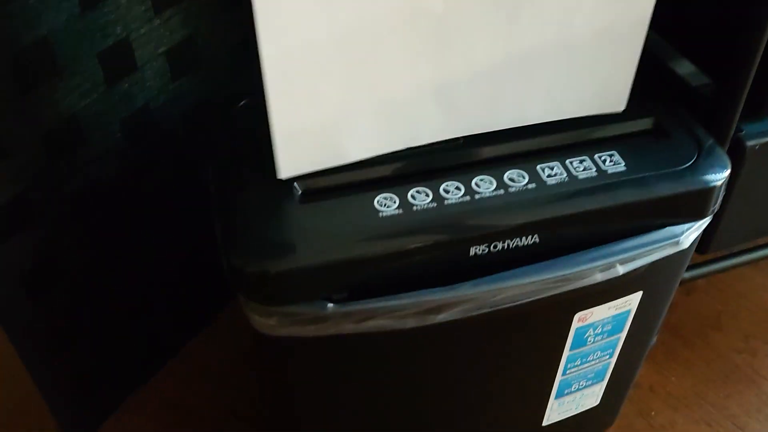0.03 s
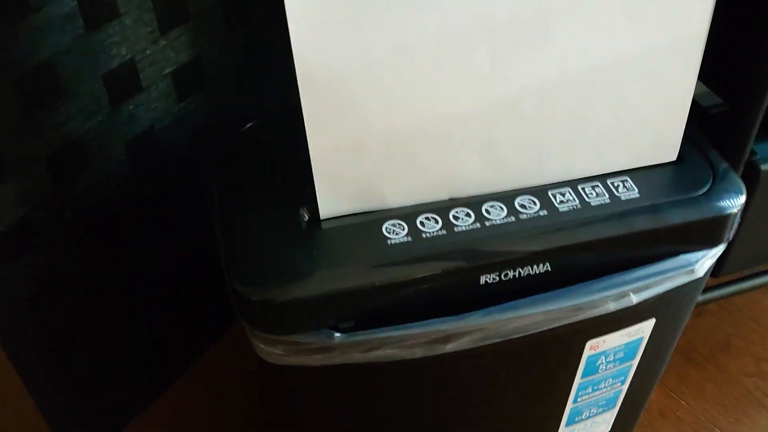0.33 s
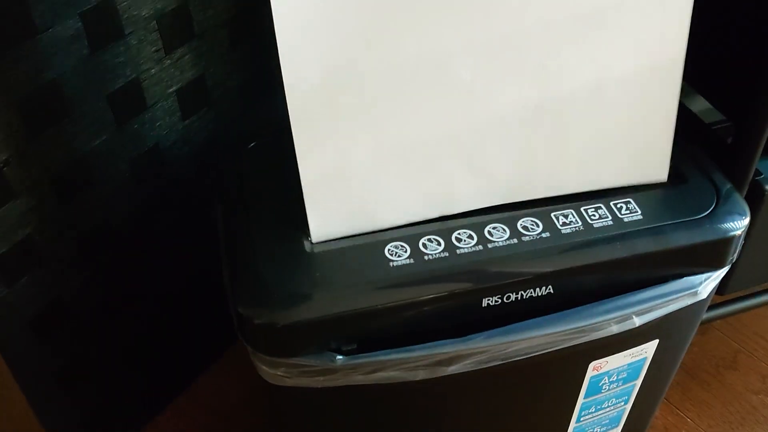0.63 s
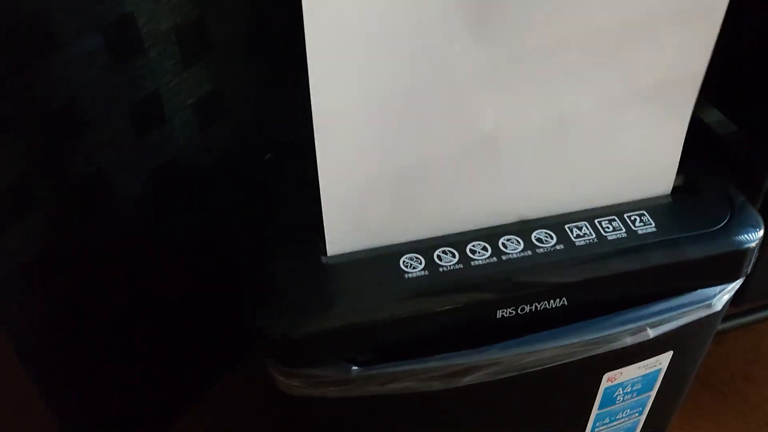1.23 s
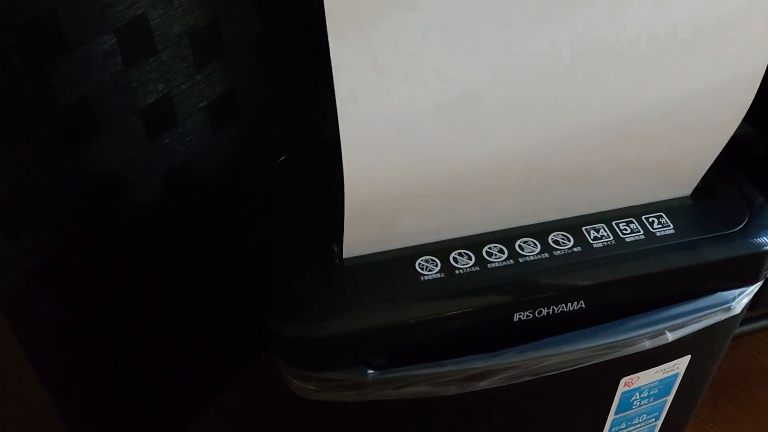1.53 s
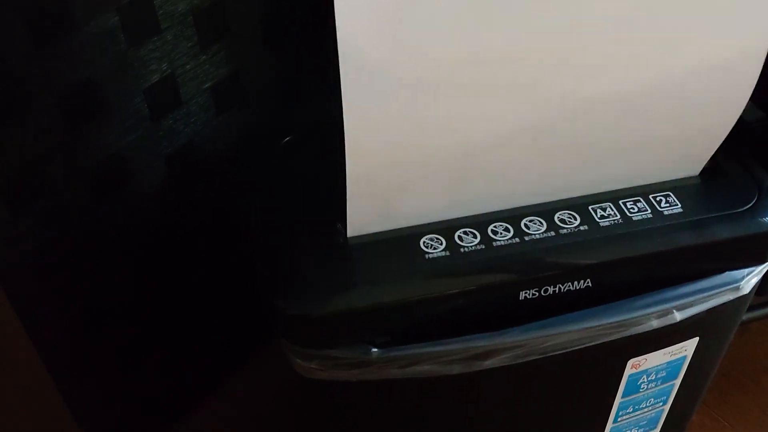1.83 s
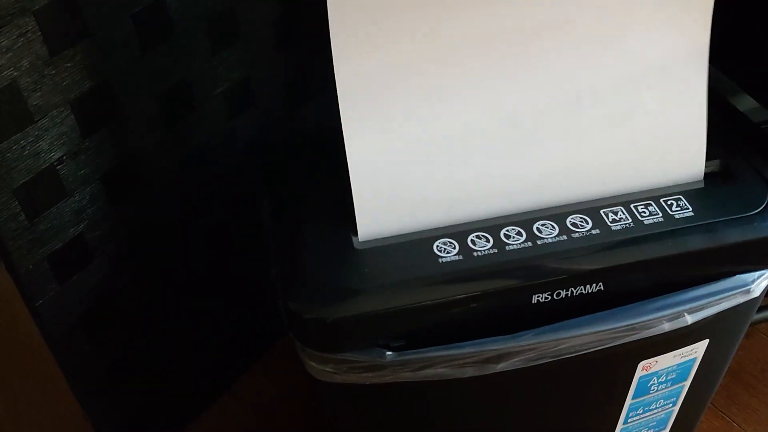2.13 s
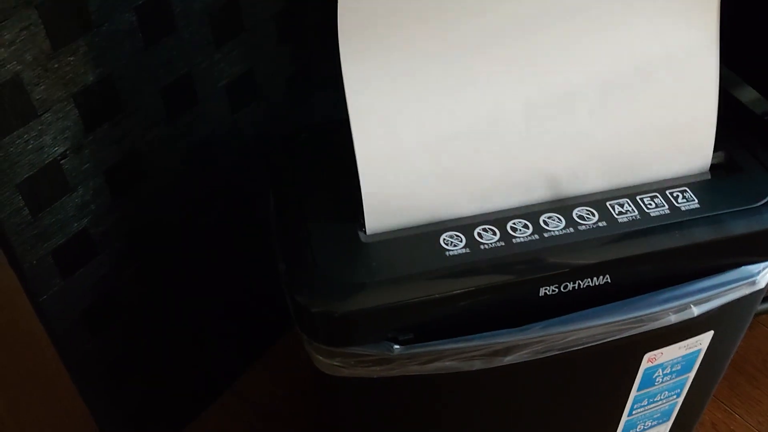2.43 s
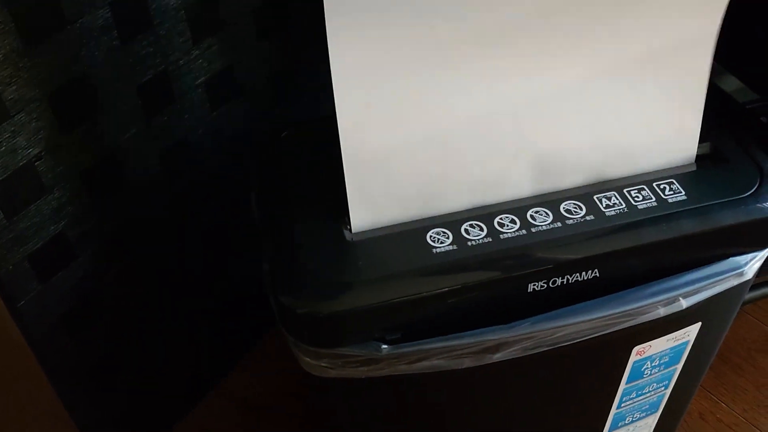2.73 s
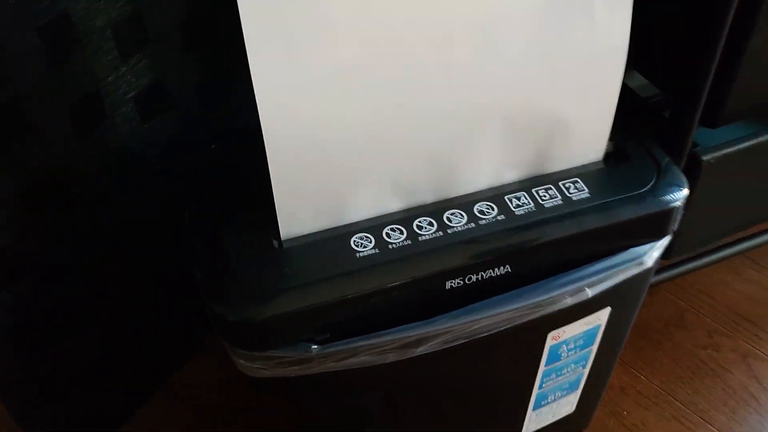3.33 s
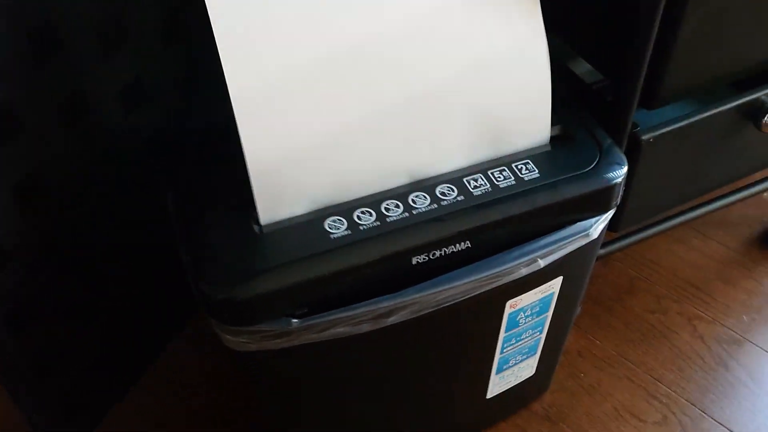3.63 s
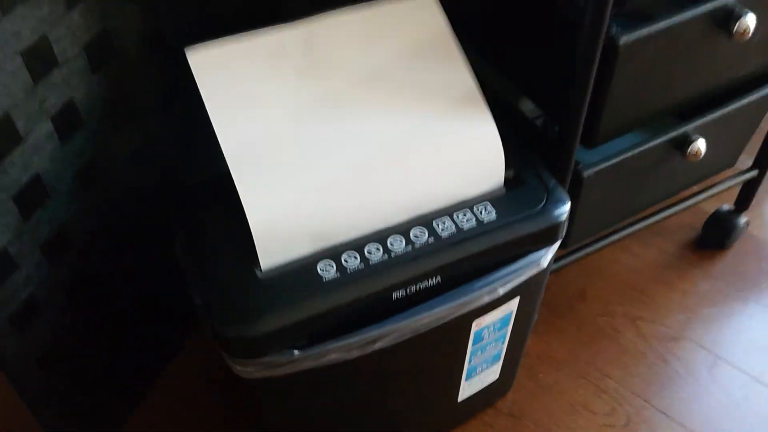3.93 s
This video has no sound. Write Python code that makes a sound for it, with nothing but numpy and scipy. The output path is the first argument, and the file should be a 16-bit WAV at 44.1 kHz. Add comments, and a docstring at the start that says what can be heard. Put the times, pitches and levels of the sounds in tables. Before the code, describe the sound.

A small paper shredder runs in a room. First a sheet rustles and taps at the slot, then the motor spins up with a rattling whine, and the cutters tear the paper with loud crackles and snaps.

```python
"""A small paper shredder in a room. Air rumbles faintly on the microphone throughout.
From 0.2 s a sheet rustles and taps at the slot; at 1.39 s it trips the switch.
The motor spins up with a whine of gears, a rattle and a hiss of brushes.
From 2.5 s the cutters tear the sheet in about 13 crackling bites a second, which drag the motor
down a little. Loud snaps stand out; the bin booms near 3.4 s."""
import sys
import numpy as np
from scipy import signal
from scipy.fft import rfft, irfft, next_fast_len
from scipy.io import wavfile

SR = 44100
rng = np.random.default_rng(int(sys.argv[2]) if len(sys.argv) > 2 else 0)


def put_to_file(sound):
    """Save the sound as 16-bit audio at rate SR, in the file named by the first command-line argument."""
    columns = np.atleast_2d(sound).T  # one column per channel
    safe = np.clip(columns, -1, 1)
    whole_steps = np.round(safe * 32767)
    wavfile.write(sys.argv[1], SR, whole_steps.astype(np.int16))


N = 176400
T = np.arange(N) / SR
FFT_SIZE = next_fast_len(N + SR)
FREQ_HZ = np.maximum(np.arange(FFT_SIZE // 2 + 1) * SR / FFT_SIZE, 1)
START_S, CATCH_S, FIRST_BITE_S = 1.39, 2.535, 2.556
PINION_TEETH, MESHES_PER_IDLER_TOOTH, MESHES_PER_BITE = 4, 5, 62

# Levels are relative; spectra are densities; pan is left minus right.
# left-right likeness of noise: f/Hz, correlation
CORRELATION = [(30, 0), (120, 1), (300, 0.96), (600, 0.68), (1200, 0.25), (8000, 0)]

# air rumble: f/Hz, level/dB
AIR_SPECTRUM = [(25, -6), (40, -7), (60, -23.5), (150, -33), (205, -26.5), (270, -55), (370, -33),
                (520, -47.5), (6000, -54), (8000, -67), (16000, -55)]
# f/Hz, pan/dB
AIR_PAN = [(40, 34), (250, 14), (8000, -4)]
# t/s, level/dB
AIR_LEVEL = [(1.8, -52), (2.7, -58), (3.2, -50), (4.0, -41.5)]

# taps at the slot: t/s, level/dB, treble/dB (half is added to the edge's tick)
TAPS = [(0.234, -42, -24), (0.274, -32, -10), (0.304, -22.5, -12.5), (0.341, -32, -5),
        (0.605, -29.5, -18.5), (0.693, -27.5, -7), (0.761, -27.5, -47), (0.811, -33, 5.5),
        (0.923, -40, -30), (0.955, -37, -18), (1.056, -44.5, -38), (1.389, -37, 0), (1.418, -26.5, -1.5)]
# sheet sliding and flexing: t/s, level/dB
SLIDE_LEVEL = [(0.22, -85), (0.3, -38), (0.36, -44.5), (0.5, -65), (0.58, -63), (0.62, -44.5), (0.69, -48),
               (0.79, -62), (0.97, -61), (1.1, -88), (1.3, -90), (1.32, -58.5)]
# f/Hz, level/dB
SHEET_SPECTRUM = [(120, -7), (250, -10.5), (380, -2), (1200, 0), (2200, -10.5), (4000, -18.5), (6300, -25),
                  (8000, -40), (11000, -30), (16000, -39)]
# f/Hz, pan/dB
SHEET_PAN = [(150, 9), (400, -1.5), (1300, 0.5), (2400, 10), (7000, -13.5), (15000, 15)]
# edge hissing along the slot: t/s, level/dB
EDGE_LEVEL = [(0.25, -90), (0.32, -51), (0.52, -100), (0.69, -75), (0.71, -49), (0.79, -88.5), (1.02, -63),
              (1.1, -99)]
# f/Hz, level/dB
EDGE_SPECTRUM = [(300, -13), (1200, 4.5), (2500, 0), (4300, 5), (6300, -8.5), (8300, -16.5), (11000, -7),
                 (16000, -12)]

# pinion mesh rate: t/s, f/Hz
MESH_RATE = [(1.39, 250), (1.45, 435), (1.5, 585), (1.55, 672), (1.6, 728), (1.68, 772), (1.75, 793),
             (2.0, 818), (2.26, 838), (2.5, 849), (3.0, 808), (3.42, 813), (3.62, 826), (4.0, 825)]
# whine at the mesh rate: t/s, level/dB, pan/dB
WHINE_1X = [(1.49, -48, 0), (1.53, -33.5, 6), (1.59, -24.5, 1.5), (1.68, -32.5, 6), (1.8, -24.5, 1),
            (2.1, -24.5, -2.5), (2.25, -44.5, -13), (2.39, -29.5, 0), (2.49, -47, 4), (2.65, -32, 2),
            (2.81, -37, -14), (2.88, -21.5, 0.5), (3.1, -30, 1), (3.33, -21.5, 2.5), (3.58, -30, 9),
            (3.61, -46, 23), (4.0, -46, 21)]
# second harmonic: t/s, level/dB, pan/dB
WHINE_2X = [(1.44, -46, 0), (1.475, -32, 2), (1.5, -38, 2), (1.55, -29.5, 2), (1.6, -40, 4), (1.7, -43, 5),
            (1.77, -34.5, 3), (2.05, -39, 18), (2.45, -42, 14), (2.6, -36, 9), (2.9, -33.5, 17),
            (3.4, -37.5, 16), (4.0, -42, 9)]
# third harmonic: t/s, level/dB
WHINE_3X = [(1.48, -60), (1.53, -42), (1.9, -44), (2.4, -48)]
# rotor harmonics: multiple of rotor rate, level/dB
ROTOR_ORDERS = [(16, -52.5), (23, -53), (39, -52.5), (62, -55)]
# idler harmonics: multiple of its mesh rate, level/dB
IDLER_ORDERS = [(2, -52), (4, -50.5), (7, -48), (8, -46)]
# gear rattle and brush hiss: f/Hz, level/dB
RATTLE_SPECTRUM = [(70, -19.5), (170, -4), (320, -4), (520, -9), (780, 1), (1100, -3.5), (1800, -7),
                   (3100, -14.5), (4800, -13), (7200, -18.5), (8600, -20.5), (10300, -17), (16000, -29)]
# f/Hz, pan/dB
RATTLE_PAN = [(400, -1), (750, -1.5), (1300, 3), (2400, 9.5), (4400, 1), (8100, 1.5), (15000, 14)]
# t/s, level/dB
RATTLE_LEVEL = [(1.39, -44), (1.43, -34.5), (1.5, -33), (1.58, -30.5), (2.5, -29), (4.0, -28.5)]
# rubbing teeth: multiple of mesh rate, level/dB, case resonance f/Hz
RUB_BANDS = [(5, -46, 3960), (6, -51.5, 4720), (10, -49, 8250)]

# tearing paper: f/Hz, level/dB
TEAR_SPECTRUM = [(100, -29), (175, 2), (240, -14.5), (550, -14.5), (900, -6.5), (2000, 1.5), (4300, -1),
                 (5800, -3.5), (7300, -10.5), (8800, -15.5), (10500, -12), (16000, -13)]
# f/Hz, pan/dB
TEAR_PAN = [(70, 11.5), (200, -4), (600, -6), (1300, 8.5), (2400, 5), (4400, -2), (8100, -1), (15000, 8)]
# t/s, level/dB
TEAR_LEVEL = [(2.54, -23), (2.66, -24), (2.82, -29.5), (2.88, -24), (3.1, -26), (3.25, -27.5), (3.6, -25),
              (3.8, -26), (4.0, -23)]
# snaps of the sheet: t/s, level/dB, ring f/Hz
SNAPS = [(2.626, -16, 2400), (2.6822, -18, 2100), (2.7238, -20, 4100), (2.7717, -8.5, 6230),
         (2.8153, -18, 6200), (2.8554, -10.5, 6330), (3.047, -13.5, 2100), (3.129, -19, 3560),
         (3.205, -16.5, 6400), (3.2855, -21.5, 2800), (3.3536, -23, 3400), (3.548, -16, 12000),
         (3.665, -19.5, 2350), (3.7014, -16, 2050), (3.775, -14, 2090), (3.82, -15, 4660),
         (3.8416, -13, 4560), (3.893, -17, 5430), (3.9915, -10, 2900)]
# boom of the bin: f/Hz, level/dB
BIN_SPECTRUM = [(30, -16), (70, -2.5), (105, -13), (175, -9), (260, -27.5)]
# t/s, level/dB
BIN_LEVEL = [(2.5, -69), (3.25, -44), (3.38, -31.5), (3.55, -49)]


def from_db(db):
    """Decibels to gain."""
    return 10 ** (np.asarray(db) / 20)


def unit_rms(x):
    """Scale to unit power."""
    return x / np.sqrt(np.mean(x ** 2) + 1e-20)


def in_time(table):
    """Each value column at every sample."""
    times_s, *columns = np.transpose(table)
    return [np.interp(T, times_s, column) for column in columns]


def in_frequency(table):
    """Table value at every FFT bin."""
    hz, value = np.transpose(table)
    return np.interp(np.log(FREQ_HZ), np.log(hz), value)


def pan(db):
    """Left and right gains for a level difference."""
    return from_db(np.array([[.5], [-.5]]) * db)


def drift(rate_hz):
    """Slow random wander, unit RMS."""
    hop, settle = 40, 2000
    pole = np.exp(-2 * np.pi * hop * rate_hz / SR)
    noise = rng.standard_normal(N // hop + settle + 2)
    slow = signal.lfilter([1], [1, -2 * pole, pole * pole], noise)[settle:]
    return np.interp(np.arange(N) / hop, np.arange(len(slow)), unit_rms(slow))


def colour(x, spectrum, pan_table):
    """Minimum-phase filter of unit power gain; blends the channels in the bass, pans each band."""
    gain = unit_rms(from_db(in_frequency(spectrum)))
    cepstrum = irfft(np.log(gain), FFT_SIZE)[:FFT_SIZE // 2]
    response = np.exp(rfft(2 * cepstrum, FFT_SIZE) - cepstrum[0])
    blend_rad = np.arcsin(np.clip(in_frequency(CORRELATION), 0, 1)) / 2
    channels = rfft(x, FFT_SIZE)
    blended = np.cos(blend_rad) * channels + np.sin(blend_rad) * channels[::-1]
    return irfft(blended * response * pan(in_frequency(pan_table)), FFT_SIZE)[:, :N]


def room(x, wet_db, case_t60_s=.053, room_t60_s=.35, tail_db=-8.5):
    """Direct sound, quick case reflections and room tail; power is kept."""
    t = T[:SR // 2]
    case, tail = [unit_rms(rng.standard_normal((2, len(t))) * from_db(-60 * t / t60_s))
                  for t60_s in (case_t60_s, room_t60_s)]
    response = from_db(wet_db) * (case + from_db(tail_db) * tail) / np.sqrt(len(t))
    response[:, 0] += 1
    return signal.fftconvolve(x, response / np.sqrt(np.sum(response ** 2) / 2), axes=1)[:, :N]


def crackle(per_s, spread_db):
    """Random clicks of uneven size, with their own strength in each ear."""
    sizes = from_db(spread_db * np.minimum(rng.exponential(1, N), 4.5))
    return unit_rms((rng.random(N) < per_s / SR) * sizes * rng.uniform(-1.02, 1, (2, N)))


def bursts(times_s, levels_db, decay_s):
    """Short decaying noise bursts."""
    onsets = np.zeros(N)
    onsets[(np.asarray(times_s) * SR).astype(int)] = from_db(levels_db)
    envelope = signal.lfilter([1], [1, -np.exp(-1 / (decay_s * SR))], onsets + 1e-18)
    return envelope * rng.standard_normal((2, N))


def partial(cycles, db, flutter_hz, flutter_db=3):
    """One tone, fluttering separately in each ear."""
    wave = np.sqrt(2) * np.sin(2 * np.pi * (cycles + rng.random()))
    return np.array([wave * from_db(db + flutter_db * drift(flutter_hz)) for ear in range(2)])


def air():
    """Moving air: faint low rumble."""
    rumble = colour(rng.standard_normal((2, N)), AIR_SPECTRUM, AIR_PAN)
    return from_db(in_time(AIR_LEVEL)[0]) * rumble


def fibres(per_s, spread_db):
    """Paper crackle: broad clicks plus clumps of grains ringing in separate bands."""
    edges_hz = np.geomspace(350, 16000, 9)
    grains = 0
    for band_hz in zip(edges_hz, edges_hz[1:]):
        clumps = crackle(per_s / 2, spread_db) * from_db(7.5 * np.tanh(drift(70)))
        bandpass = signal.butter(2, band_hz, "band", fs=SR, output="sos")
        grains += signal.sosfilt(bandpass, clumps + 1e-18)
    return unit_rms(grains + crackle(per_s, spread_db))


def sheet():
    """The sheet flexes and slides; its edge taps and hisses at the slot."""
    times_s, tap_db, treble_db = np.transpose(TAPS)
    sliding = (T > SLIDE_LEVEL[0][0]) * (T < START_S)
    flex = fibres(per_s=2500, spread_db=5.5) * from_db(in_time(SLIDE_LEVEL)[0]) * sliding
    flex += bursts(times_s, tap_db - 9, decay_s=.0025)
    edge = bursts(times_s, tap_db + .5 * treble_db + 1, decay_s=.0021)
    edge += from_db(in_time(EDGE_LEVEL)[0]) * crackle(per_s=2400, spread_db=3.5)
    return (colour(room(flex, wet_db=-1.5), SHEET_SPECTRUM, SHEET_PAN)
            + colour(room(edge, wet_db=.5), EDGE_SPECTRUM, SHEET_PAN))


def gear_whine(mesh_cycles):
    """Three pinion harmonics swell through case resonances; the teeth chatter at first."""
    first_db, first_pan_db = in_time(WHINE_1X)
    second_db, second_pan_db = in_time(WHINE_2X)
    chatter_cycles = .05 * np.exp(-np.maximum(T - START_S, 0) / .3) * drift(90)
    cycles = mesh_cycles + chatter_cycles
    lead_rad = np.array([[.45], [0]])
    first = np.sqrt(2) * np.sin(2 * np.pi * cycles + lead_rad) * from_db(first_db + 1.4 * drift(35))
    second = partial(2 * cycles, second_db, flutter_hz=30)
    third = .98 * partial(3 * cycles, in_time(WHINE_3X)[0], flutter_hz=30)
    return (first * pan(first_pan_db) + second * pan(second_pan_db) + third) * (T > START_S)


def motor_tones(mesh_cycles, speed_ratio, rise_db_per_oct=35):
    """Rotor and idler harmonics, louder with speed."""
    rise_db = rise_db_per_oct * np.log2(speed_ratio)
    tones = 0
    for divisor, orders in ((PINION_TEETH, ROTOR_ORDERS), (MESHES_PER_IDLER_TOOTH, IDLER_ORDERS)):
        for order, db in orders:
            tones += partial(order * mesh_cycles / divisor, db + rise_db, flutter_hz=25)
    return tones * (T > START_S)


def rattle(mesh_cycles, speed_ratio, treble_hz=2500):
    """Gear rattle and brush hiss throb once per rotor turn; treble grows with speed."""
    throb = unit_rms(from_db(2.8 * np.sin(2 * np.pi * mesh_cycles / PINION_TEETH) + 1.34 * drift(30)))
    envelope = throb * from_db(in_time(RATTLE_LEVEL)[0]) * (T > START_S)
    clicks = room(crackle(per_s=9000, spread_db=2.5) * envelope, wet_db=2)
    dull = signal.lfilter(*signal.butter(1, treble_hz, fs=SR), clicks)
    return colour(dull + (clicks - dull) * speed_ratio ** 2, RATTLE_SPECTRUM, RATTLE_PAN)


def rubbing_teeth(mesh_cycles, mesh_hz, width_hz=115, relative_resonance_width=.045):
    """Narrow hiss bands glide with the gears, each loudest at a case resonance."""
    bands = 0
    for order, db, resonance_hz in RUB_BANDS:
        phase_rad = 2 * np.pi * order * mesh_cycles
        detuning = (order * mesh_hz / resonance_hz - 1) / relative_resonance_width
        hiss = np.array([drift(width_hz) * np.sin(phase_rad) + drift(width_hz) * np.cos(phase_rad)
                         for ear in range(2)])
        bands += from_db(db) * hiss / (1 + detuning ** 2)
    return bands * (T > START_S)


def cutters(mesh_cycles, bite_depth_db=2.5):
    """Fibres break in a surge at each bite; snaps stand out."""
    bites = (mesh_cycles - np.interp(FIRST_BITE_S, T, mesh_cycles)) / MESHES_PER_BITE
    surge_db = bite_depth_db * np.cos(2 * np.pi * bites)
    flicker_db = 3.4 * np.tanh(drift(70))
    envelope = from_db(in_time(TEAR_LEVEL)[0] + surge_db + flicker_db + 1) * (T > CATCH_S)
    tearing = fibres(per_s=2400, spread_db=3.5) * envelope + snaps()
    return colour(room(tearing, wet_db=-4), TEAR_SPECTRUM, TEAR_PAN)


def snaps(decay_s=.0014):
    """Each sharp crack sets a patch of the sheet ringing briefly."""
    total = 0
    for time_s, db, ring_hz in SNAPS:
        crack = bursts([time_s], [0], decay_s)
        snap = signal.lfilter(*signal.iirpeak(ring_hz, Q=2, fs=SR), crack) + .3 * crack
        total += from_db(db) * snap / np.sqrt(np.sum(snap ** 2) / (2 * decay_s * SR))
    return total


def bin_boom():
    """The bin booms below the cutters: a swell of low noise."""
    noise = rng.standard_normal((2, N)) * from_db(in_time(BIN_LEVEL)[0]) * (T > CATCH_S)
    return colour(noise, BIN_SPECTRUM, TEAR_PAN)


def scene():
    """Air, sheet and shredder; one jittering mesh phase drives motor, gears and cutters."""
    mesh_hz = in_time(MESH_RATE)[0]
    mesh_cycles = np.cumsum(mesh_hz) / SR + .012 * drift(26)
    speed_ratio = mesh_hz / mesh_hz[-1]
    return (air() + sheet() + gear_whine(mesh_cycles)
            + motor_tones(mesh_cycles, speed_ratio) + rattle(mesh_cycles, speed_ratio)
            + rubbing_teeth(mesh_cycles, mesh_hz) + cutters(mesh_cycles) + bin_boom())


def record(dry):
    """Soft clip, then low-pass."""
    cutoff_hz = 16000
    return signal.sosfilt(signal.ellip(12, .1, 80, cutoff_hz, fs=SR, output="sos"), np.tanh(dry))


dry = scene()
out = record(dry)
put_to_file(out)
```